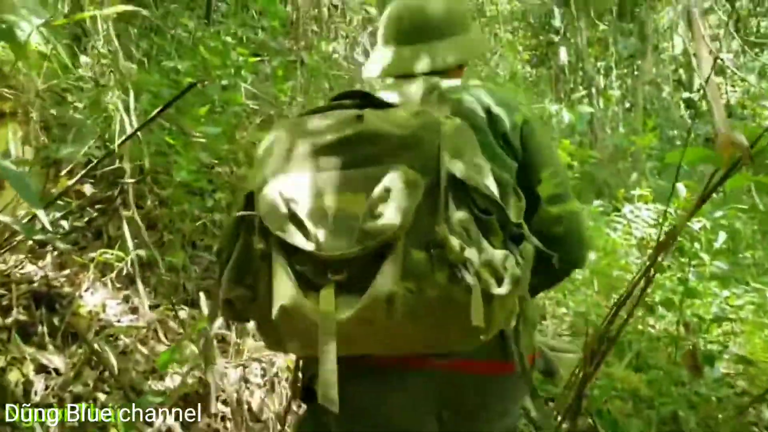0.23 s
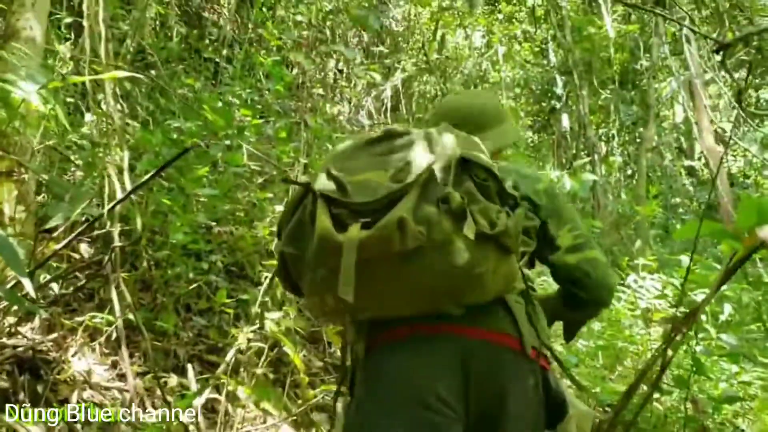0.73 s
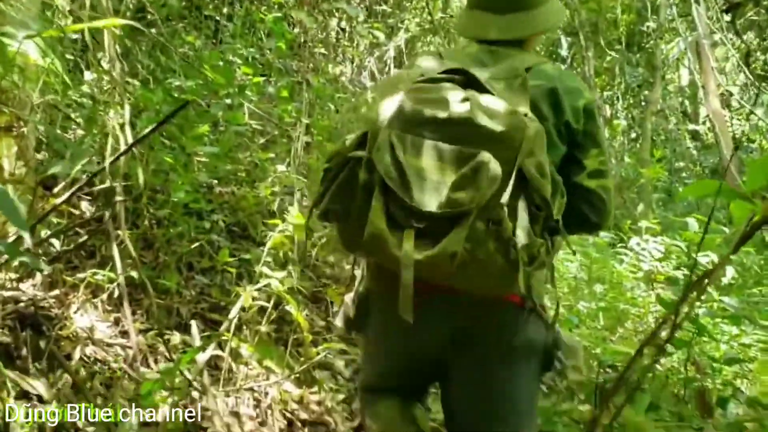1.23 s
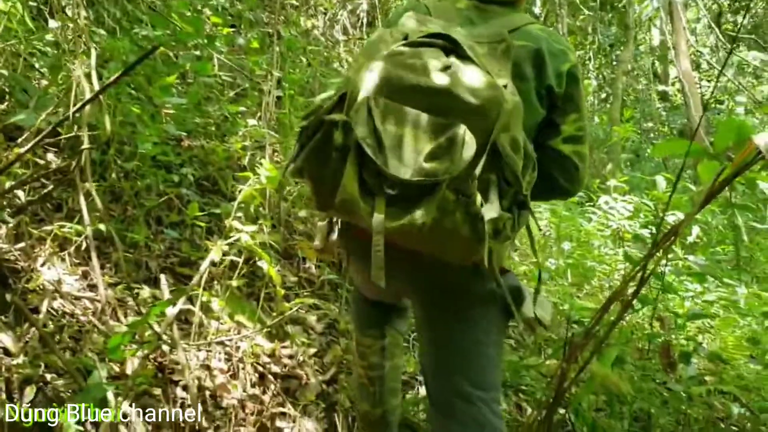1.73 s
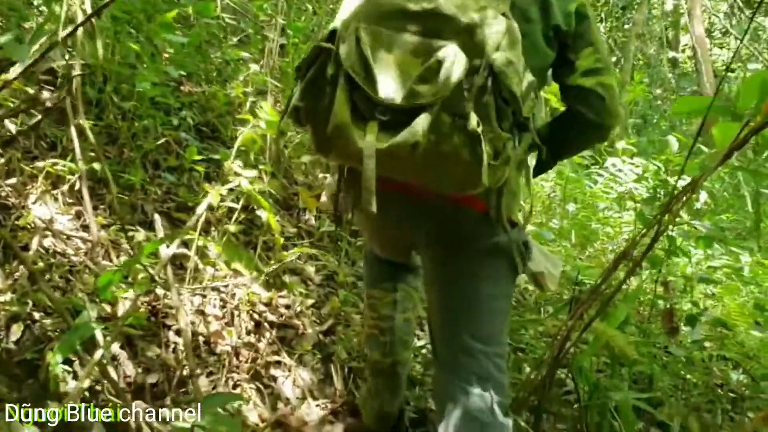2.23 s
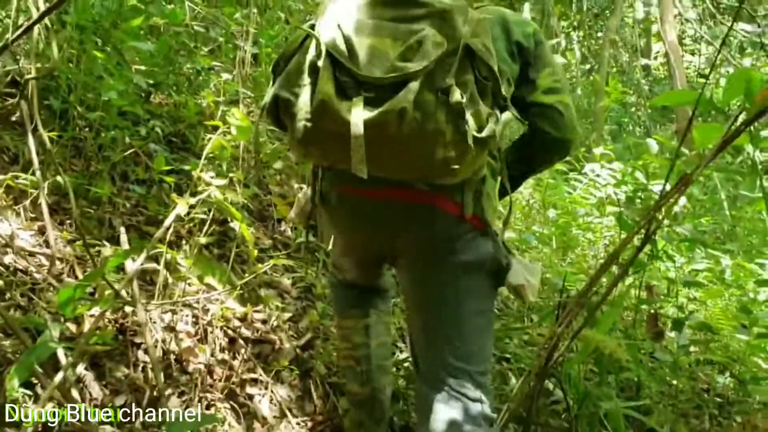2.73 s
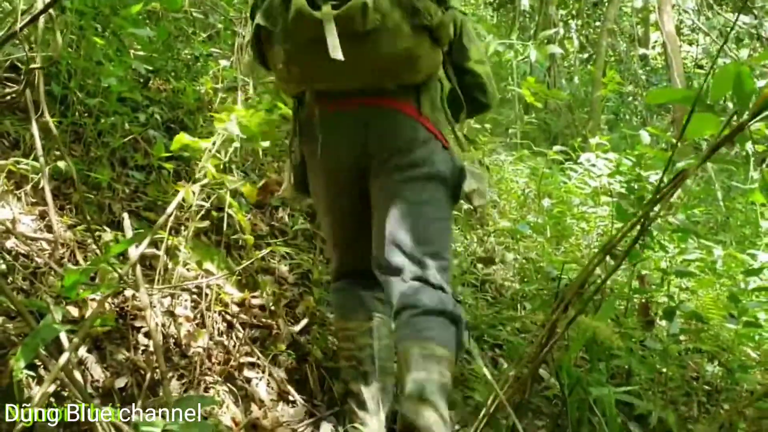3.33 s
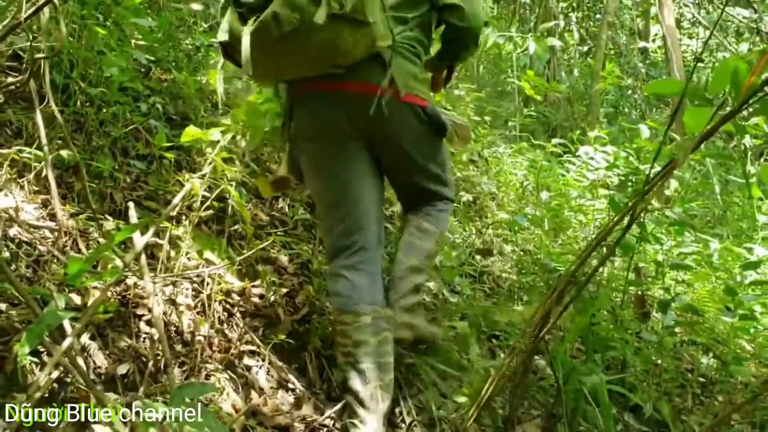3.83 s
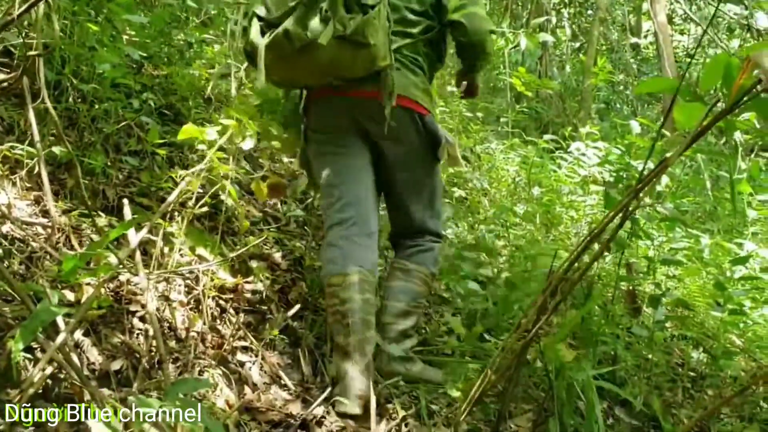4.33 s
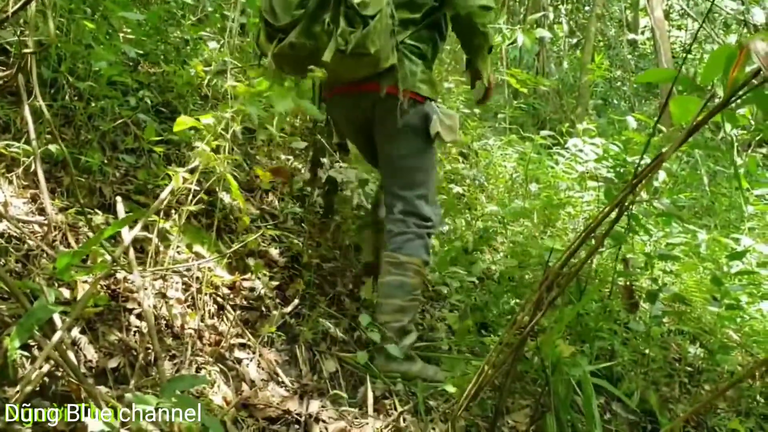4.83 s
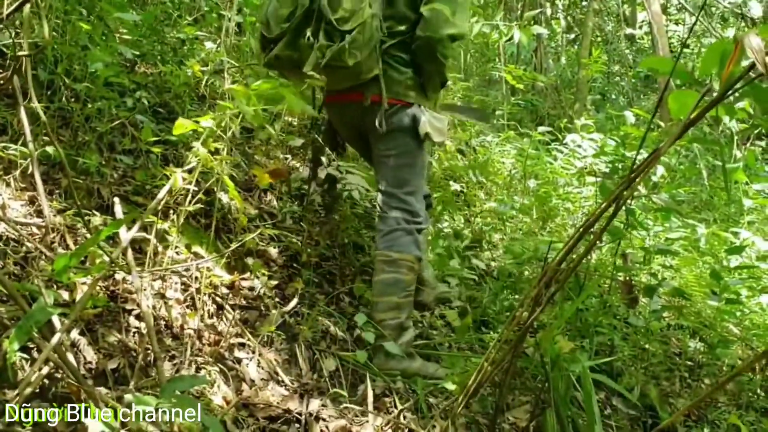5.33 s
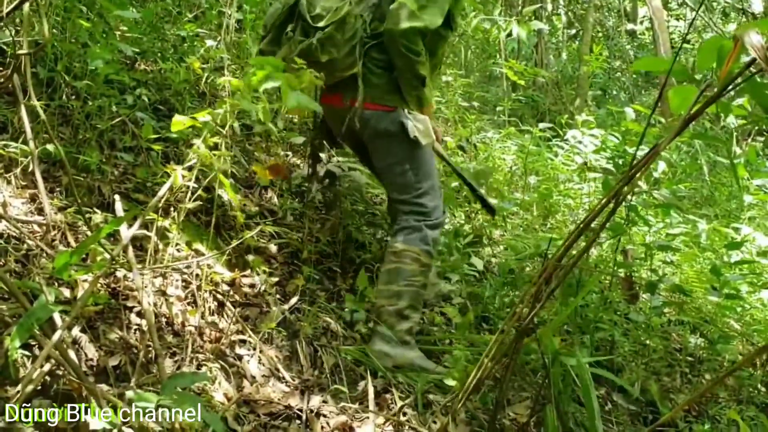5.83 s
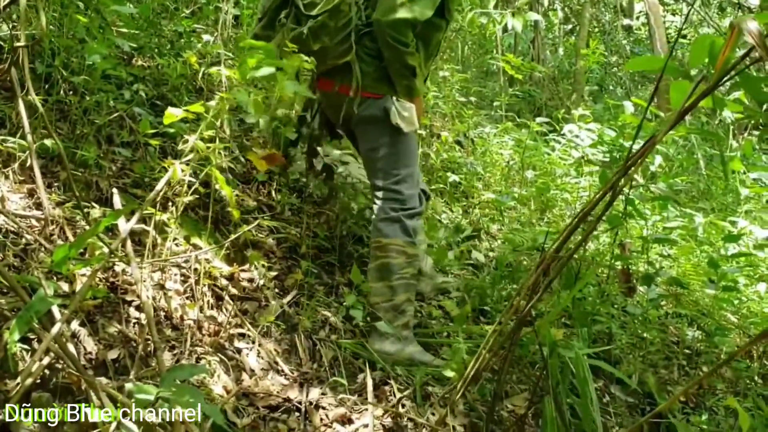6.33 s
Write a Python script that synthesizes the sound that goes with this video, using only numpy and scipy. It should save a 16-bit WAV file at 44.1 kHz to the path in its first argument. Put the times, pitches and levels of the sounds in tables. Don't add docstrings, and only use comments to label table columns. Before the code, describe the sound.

A close, dry outdoor sound of rubber boots climbing through leaf litter, slightly left of centre, over a faint, wide forest hiss. From 0 s leaves crackle and rustle softly; twigs snap near 0.4 s, a brittle crack comes at 0.53, and a big crunch swells from 0.6 to 0.9 with woody knocks. Shorter crunches and snaps follow at 1.0-1.15, then it calms. At 1.65-1.9 a low fluttering air puff hits the left side only. Brushing leaves and snaps lead to a hard, abrupt knock and crunch at 2.5. Leaves settle, with treads near 2.9, 3.15 and 3.4 and a sharp snap at 3.98. A broad heavy crunch with deep soil thumps lands at 4.1-4.2, fading in rustles. Quiet until a step at 5.18, a left-side crack at 5.72, then light crunches and swishes at 5.8, 6.2 and 6.4 to the end.

```python
import sys
import numpy as np
from scipy import signal
from scipy.fft import rfft, irfft, dct, next_fast_len
from scipy.io import wavfile
from scipy.ndimage import uniform_filter1d, map_coordinates

SR = 44100
rng = np.random.default_rng(int(sys.argv[2]) if len(sys.argv) > 2 else 0)


def waveform_to_disk(signal):
    frames = np.transpose(np.atleast_2d(signal))
    scaled = np.clip(frames, -1, 1) * 32767
    samples = np.round(scaled).astype(np.int16)
    wavfile.write(sys.argv[1], SR, samples)


def how_loud(loudness_db):
    steps = np.asarray(loudness_db, float) / 20
    return 10 ** steps


N = 289737


def unit(x):
    return x / np.sqrt(np.mean(x ** 2) + 1e-20)


def along(points, hz):
    f, v = np.transpose(points)
    return np.interp(np.log(hz + 1), np.log(f + 1), v)


def curve(rows):
    s, value = np.transpose(rows)
    return np.interp(np.arange(N) / SR, s, value)


def wobble(rate):
    knots = rng.standard_normal(int(N * rate / SR) + 4)
    return map_coordinates(knots, [np.arange(N) * rate / SR])


def filtered(x, response):
    m = next_fast_len(N + 8192)
    return irfft(rfft(x, m) * response(np.fft.rfftfreq(m, 1 / SR)), m)[..., :N]


def coloured(x, spectrum):
    return unit(filtered(x, lambda hz: how_loud(along(spectrum, hz))))


def sides(pan_db):
    half = np.atleast_1d(pan_db) / 2
    return how_loud(np.array([half, -half]))


def swells(s, db, rise, fall, bed_db=-120):
    t = np.arange(0, N / SR + .002, .001)[:, None] - s
    skirt = np.maximum(-t / np.abs(rise), t / np.abs(fall)) ** 1.5
    power = how_loud(2 * (db - 10 * skirt)).sum(1)
    return 10 * np.log10(np.interp(np.arange(N) / SR, t[:, 0] + s[0], power) + how_loud(2 * bed_db))


# f/Hz, likeness (0 to 1)
ALIKE = [(100, 0.929), (300, 0.9), (600, 0.6), (1200, 0.45), (2500, 0.054)]


def diffuse():
    turn = lambda hz: np.arccos(np.clip(along(ALIKE, hz), -1, 1)) / 2
    mid, side = filtered(rng.standard_normal((2, N)), lambda hz: [np.cos(turn(hz)), np.sin(turn(hz))])
    return np.array([mid + side, mid - side])


# f/Hz, level/dB
FOREST = [(18, -36), (30, -15.5), (71, 2), (236, -16), (388, 8.5), (764, -5.5), (1860, -3), (3480, -2),
          (4170, 5), (7410, 0), (8670, -5.5), (15400, 3)]


def forest():
    return how_loud(-64.5 + .8 * wobble(3)) * coloured(diffuse(), FOREST) * sides(3)


def patches(x, depth_db):
    z = signal.stft(x, nperseg=256)[2]
    field = uniform_filter1d(rng.standard_normal(z.shape[1:]), 5, 0)
    field = uniform_filter1d(field, 8, 1)
    return signal.istft(z * how_loud(depth_db * unit(field)), nperseg=256)[1][:, :N]


def crackle(count, spread_db, life_s, clump_db, hush, lurch):
    port_gap_s = .00016
    when, near = rng.uniform(size=(2, count))
    size = how_loud(spread_db * np.minimum(rng.exponential(size=count), 3.8)) * rng.choice([-1, 1], count)
    lag = rng.standard_normal(count) * port_gap_s * SR
    kind = rng.integers(0, 4, count)
    t = np.arange(SR // 40) / SR
    out = np.zeros((2, N))
    for k in range(4):
        ring = rng.standard_normal(len(t)) * how_loud(-60 * t / (life_s * (1 + k) / 2.144))
        pick = kind == k
        for ch, sign in enumerate((1, -1)):
            at = np.clip(when[pick] * N + sign * lag[pick] / 2, 0, N - 1).astype(int)
            hits = np.bincount(at, size[pick] * how_loud(sign * 7.307 * (near[pick] - 1.0)), N)
            out[ch] += signal.fftconvolve(hits, unit(ring))[:N]
    slips = np.bincount((when[:240] * N).astype(int), near[:240] ** 2, N)
    surge = 1 + lurch * signal.fftconvolve(slips, how_loud(-60 * t / 0.08682))[:N]
    shower = patches(unit(out) + hush * diffuse(), depth_db=1.6829)
    return surge / np.mean(surge) * shower * how_loud(clump_db * wobble(45))


# f/Hz, level/dB
BLADES = [(1350, -14), (2300, -13), (3190, -1.5), (3680, 0.5), (7150, -1), (8690, -14.5), (9500, -13.5),
          (12400, -22), (20900, -120)]
EDGES = [(6500, -30.5), (8000, -4), (9500, -1), (12000, 3.5), (16500, 0)]
STEMS = [(440, -64), (750, -34), (914, -5), (1240, 4.5), (1680, 6), (2900, 3), (3770, -37.5), (6380, -120)]
# peak t/s, blade level/dB, rise t/s per 10 dB, fall t/s per 10 dB,
# stems over blades level/dB
STEPS = [(0.057, -49, 0.179, 0.1409, -8.5), (0.114, -49, -0.0097, 0.039, -13),
         (0.306, -56.5, 0.1385, 0.1269, -2), (0.42, -57.5, 0.1224, 0.1045, 3.5),
         (0.595, -44, 0.0834, 0.1676, -8.5), (0.776, -38, 0.1497, 0.0681, -10),
         (0.994, -56, 0.1739, 0.0224, -3), (1.047, -48, 0.0258, 0.0319, -6.5),
         (1.118, -47, 0.0495, 0.0333, -9), (1.435, -59, 0.2004, 0.055, -5),
         (1.492, -53, 0.0309, 0.0697, -8.5), (1.511, -61.5, 0.0766, 0.1271, -5.5),
         (2.072, -50, 0.0549, 0.0721, -9.9), (2.487, -43, 0.0342, 0.056, -5.5),
         (2.904, -52, 0.018, 0.2917, -12.5), (3.148, -52, 0.0164, 0.5885, -11.5),
         (3.387, -49.0, 0.0111, 0.1323, -12), (4.108, -41.5, 0.16, 0.1784, -9),
         (4.466, -53.5, 0.4696, 0.1462, -6.5), (5.179, -48, 0.0251, 0.0634, -10.5),
         (5.511, -61, 0.0917, 0.0514, -4.0), (5.816, -50, 0.1008, 0.0616, -10),
         (6.198, -50, 0.0371, 0.0805, -8.5), (6.401, -49.5, 0.0972, 0.1237, -12)]
# peak t/s, blade level/dB, rise t/s per 10 dB, fall t/s per 10 dB,
# edges over blades level/dB
SWEEPS = [(0.214, -57.5, -0.0022, 0.5148, 1.171), (0.399, -52, 0.056, 0.04, 10),
          (0.897, -44.5, 0.2357, 0.1427, 1.5685), (1.287, -53, 0.4006, 0.097, 1.8781),
          (1.646, -55.5, 0.029, 0.0611, 1.7531), (1.685, -64, 0.1444, 0.16, -6),
          (1.826, -56, 0.0566, 0.1, 0.443), (1.938, -47, 0.0681, 0.0939, 2.5),
          (2.154, -57, 0.0313, 0.0263, 0.2147), (2.286, -55, 0.1332, 0.2899, 0.2868),
          (2.52, -57, 0.103, 0.1511, -7), (2.706, -63.5, 0.201, -0.142, -1.0552),
          (2.799, -53, 0.0471, 0.0972, 1.3281), (3.661, -52.5, 0.2468, 0.1011, 0.6984),
          (3.88, -51, 0.0439, 0.2865, 4.5), (4.323, -53, 0.1265, 0.318, 1.1756),
          (4.715, -62.0, 0.8057, 0.0228, 0.3477), (4.816, -60, 0.1533, 0.0847, -2.5),
          (5.096, -61.5, 0.206, 0.0527, -0.8368), (5.285, -55, 0.0564, 0.0433, -1),
          (5.725, -50.5, 0.0598, 0.0441, 0.3431), (5.902, -54, 0.045, 0.0824, 1.9433),
          (6.107, -63, 0.0843, 0.1369, 1.056), (6.306, -52, 0.0584, 0.1421, 3.5)]


def leaves():
    bed_db, pan_db, sweep_stem_db = -74.5, 4.5, -15.5
    s, db, rise, fall, stems = np.transpose(STEPS)
    s2, db2, rise2, fall2, edges = np.transpose(SWEEPS)
    edges = np.r_[1.4046 + 0.19145 * (db + 50), edges]
    stems = np.r_[stems, np.full(len(s2), sweep_stem_db)]
    s, db, rise, fall = np.r_[s, s2], np.r_[db, db2], np.r_[rise, rise2], np.r_[fall, fall2]
    blade_db = swells(s, db, rise, fall, bed_db)
    edge_db = swells(s, db + edges, rise, fall, bed_db + np.mean(edges))
    stem_db = swells(s, db + stems, rise, fall, bed_db + np.mean(stems))
    shower = crackle(count=16000, spread_db=3.5, life_s=0.005119, clump_db=0.7463, hush=0.98884, lurch=0.3)
    blade = how_loud(blade_db) * coloured(shower, BLADES)
    edge = how_loud(edge_db) * coloured(shower, EDGES) * sides(2.2)
    stem = how_loud(stem_db) * coloured(shower, STEMS)
    return (blade + edge) * sides(pan_db) + stem * sides(0.75 + 0.8213 * pan_db)


def braced():
    brace_s, brace_db = .012, -2
    t = np.arange(N) / SR
    breaks = np.sort([row[0] for row in SNAPS + BRITTLE + SMALL_SNAPS] + [N])
    ahead = breaks[np.searchsorted(breaks, t)] - t
    return how_loud(brace_db * np.clip(1 - ahead / (2 * brace_s), 0, .5) * 2)


# f/Hz, level/dB
LITTER = [(100, -19.5), (170, -9.5), (349, 2), (389, 4), (542, -1), (799, -11), (950, -12.5), (1240, -48),
          (2090, -120)]
SOIL = [(15, -41.5), (25, -33.5), (59, 2.5), (124, 0.3), (178, 0.5), (250, -2), (320, -6.5), (550, -120)]
# peak t/s, litter creak level/dB, soil push level/dB, rise t/s per 10 dB,
# fall t/s per 10 dB
WEIGHT = [(0.114, -57.5, -69, 0.1627, 0.1574), (0.394, -57.5, -86, 0.1977, 0.089),
          (0.604, -51.5, -66, 0.0816, 0.0311), (0.682, -52.5, -63, 0.0489, 0.2179),
          (0.807, -48, -63, 0.1808, 0.0237), (0.919, -54.5, -91.5, 0.2092, 0.0903),
          (1.122, -58.0, -75.0, 0.2167, 0.0435), (1.21, -61.5, -75.5, 0.0315, 0.2559),
          (1.424, -62, -89.0, 0.0871, 0.0765), (1.6, -62, -91.0, 0.0272, 0.08),
          (1.688, -61, -90.0, 0.0261, 0.2208), (1.95, -61.5, -71.5, 0.3249, 0.0765),
          (2.079, -58.5, -59, 0.0731, 0.2118), (2.309, -65.5, -67.5, 0.1961, 0.1612),
          (2.487, -41, -57, 0.0199, 0.024), (2.5, -60, -54.5, 0.0989, 0.1042),
          (2.706, -66, -71, 0.14, -0.0371), (3.21, -67.0, -74, 0.604, 0.1655),
          (3.378, -62.5, -59, 0.048, 0.1092), (4.158, -54, -60, 0.2027, 0.0262),
          (4.17, -61, -58.5, 0.1669, 0.3873), (5.21, -62.5, -71.5, 0.0984, 0.0949),
          (5.519, -70.5, -73, 0.1986, 0.055), (6.2, -64, -67, 0.1336, 0.2903)]
# t/s, level/dB
SETTLING = [
    (0, -71),
    (2.7, -79),
    (3.9, -68.5),
    (4.65, -79),
    (5.4, -84),
    (5.8, -71.5),
    (5.97, -79.5),
    (6.57, -77),
]


def tread():
    s, creak_db, push_db, rise, fall = np.transpose(WEIGHT)
    creak_db = swells(s, creak_db, rise, fall, curve(SETTLING))
    push_db = swells(s + 0.01553, push_db, 0.609 * rise, 0.29144 * (rise + fall), bed_db=-76.5)
    grains = crackle(count=6000, spread_db=2.5, life_s=0.006694, clump_db=1.5, hush=1.0, lurch=0.2732)
    creak = coloured(grains, LITTER)
    give = rng.standard_normal(N) + .18 * rng.standard_normal((2, N))
    push = coloured(give * how_loud(1.5 * wobble(20)), SOIL)
    return (how_loud(creak_db) * creak + how_loud(push_db) * push) * sides(5.2)


# t/s, level/dB
HOLLOW = [
    (0, 3),
    (1.5, 2),
    (1.9, -1.5),
    (2.5, 5),
    (3.1, -2.5),
    (4.3, -4),
    (5.5, -1.5),
    (6.57, -6),
]


def grounded(x):
    centre_hz, width = 730, 0.15
    band = filtered(x, lambda hz: np.exp(-(np.log(hz / centre_hz + 1e-9) / width) ** 2))
    return x + (how_loud(curve(HOLLOW)) - 1) * band


# t/s, peak level/dB, pitch f/Hz, life t/s
KNOCKS = [(0.0565, -45, 400.4, 0.01105), (.2026, -44, 512.6, 0.01102), (0.7614, -30.5, 574.2, 0.01093),
          (1.0588, -45, 571.5, 0.01128), (1.428, -50, 399.1, 0.00874), (2.166, -47.5, 440.1, 0.0174),
          (2.2757, -49.5, 348.3, 0.01748), (2.399, -52.5, 409.6, 0.0117), (3.1282, -52, 460.5, 0.01228),
          (3.307, -54.5, 390.8, 0.01201), (3.3887, -47.5, 330.2, 0.01356), (3.5784, -56, 390.1, 0.01507),
          (4.959, -59, 470, 0.01314), (6.17, -51, 349.9, 0.01185), (0.557, -47.5, 546.1, 0.0131),
          (0.682, -34.5, 550, 0.01125), (0.796, -29.5, 547.7, 0.0142), (0.913, -41, 573.7, 0.02392),
          (1.224, -47, 595.8, 0.01866), (1.416, -49, 363.9, 0.0156), (1.578, -59, 392.5, 0.01193),
          (2.076, -40, 537.4, 0.00958), (2.471, -33.5, 525.6, 0.00968), (2.4968, -21.5, 403.3, 0.00945),
          (2.698, -50, 301.5, 0.01769), (3.163, -53, 417, 0.01021), (3.653, -54, 355.2, 0.0124),
          (4.089, -36.5, 287.6, 0.01883), (4.483, -48.5, 438.7, 0.01525), (5.139, -57.5, 468.6, 0.01982),
          (5.162, -52, 377.9, 0.0215), (5.715, -52, 522.8, 0.01856), (6.156, -47.5, 342.3, 0.01484),
          (6.195, -41.5, 207, 0.0133), (6.286, -51.5, 370.7, 0.01437)]


def knocks():
    out, t = np.zeros(N + SR), np.arange(SR // 10) / SR
    for s, db, hz, life in KNOCKS:
        swing = how_loud(-60 * (t / life) ** 2) * np.sin(2 * np.pi * 1.0782 * hz * t)
        ring = .5 * how_loud(-60 * t / 0.03474) * np.sin(2 * np.pi * 0.48837 * hz * t)
        out[round((s + .002) * SR):][:len(t)] += how_loud(db - 5.5) * (swing + ring)
    return out[:N] * sides(4.2)


# t/s, peak level/dB, brightness f/Hz, left over right level/dB
SNAPS = [(.2769, -39.5, 14500, -1.9), (.3925, -29, 14000, 10.6), (.4369, -33, 13000, 8.6),
         (.9014, -28, 13500, -5.2), (1.0355, -33, 7400, 5.8), (1.0506, -29, 9300, 3.5),
         (1.1189, -33, 10500, 6.2), (1.4742, -37.4, 10500, 6.9), (1.5128, -35.5, 4500, 6),
         (1.9043, -33, 14500, 9.7), (1.9331, -33, 13000, 6.8), (2.0627, -39, 9400, 7.6),
         (2.1516, -28.5, 13000, 4.3), (2.2255, -39, 6700, 9.2), (2.7812, -36.5, 9800, 3.4),
         (2.7924, -35, 13000, 3.9), (2.8966, -30, 12500, 3.8), (3.1659, -28.9, 6000, 8),
         (3.2414, -36, 13000, 10), (3.2444, -33.5, 10100, 11.9), (3.3819, -38.5, 7500, 7.6),
         (3.4923, -31.5, 7000, 8), (3.6453, -35, 14000, 0), (3.9794, -25, 13500, 2.1),
         (4.014, -29, 13000, 7.8), (5.0553, -35.5, 5500, 5.1), (5.095, -39, 6000, 2.8),
         (5.6934, -37, 6800, 4.2), (.705, -25, 12500, 5), (.7375, -26, 13000, 5), (2.4715, -35, 3500, 4),
         (2.9155, -38, 13900, 3), (3.8234, -42, 13500, 4), (5.1685, -38, 5500, 4), (5.183, -36, 5000, 4)]
# t/s, peak level/dB
SMALL_SNAPS = [(1.124, -32), (1.534, -41), (1.641, -41), (1.772, -46), (2.232, -43), (1.7927, -43), (2.0785, -33),
               (2.3985, -41), (2.4433, -40), (2.7557, -45), (2.7653, -45), (2.806, -39), (3.0775, -42),
               (3.3, -39), (3.1266, -38), (3.517, -41), (3.715, -41), (3.7438, -42), (4.7154, -45), (4.7493, -47),
               (5.1414, -47), (5.6757, -42), (5.699, -38), (5.9036, -41), (6.0474, -42.5), (6.0741, -48),
               (6.1594, -45)]
# t/s, peak level/dB, brightness f/Hz, left over right level/dB
BRITTLE = [
    (.5281, -24, 8000, 10.8),
    (4.7866, -34.5, 11500, 6.1),
    (5.7176, -29, 8000, 8.8),
]


def snaps():
    tear, tear_s, crumble, crumble_s = .42, .28, .14, .08
    out, lead = np.zeros((2, N + SR)), SR // 300
    t = (np.arange(SR // 12) - lead) / SR
    f = np.fft.rfftfreq(len(t), 1 / SR)
    twigs = list(SNAPS) + [(s, db, 8000, 6) for s, db in SMALL_SNAPS]
    twigs = [(*row, .0043) for row in twigs] + [(*row, .002) for row in BRITTLE]
    for s, db, hz, pan_db, life in twigs:
        body_db = -12 - 6 * np.log(hz / 9500)
        bright = np.exp(-(np.log(f / hz + 1e-3) / .85) ** 2)
        body = how_loud(body_db) * np.exp(-(np.log(f / 1700 + 1e-3) / .45) ** 2)
        noise = rng.standard_normal((3, len(t)))
        noise = noise[0] + 1.2965 * noise[1:]
        burst = irfft(rfft(noise) * (bright + body), len(t))
        fall = how_loud(-60 * t / (2.5 * life)) + crumble * how_loud(-60 * t / crumble_s)
        burst = burst * np.where(t < 0, tear * (t > -tear_s * life), fall)
        burst = burst / np.abs(burst).max(axis=1, keepdims=True)
        out[:, round(s * SR) - lead:][:, :len(t)] += how_loud(db - 1) * sides(pan_db) * burst
    return out[:, :N]


# t/s, peak level/dB, pitch f/Hz, left over right level/dB
POPS = [(.2769, -42, 1414, -4), (0.387, -48.5, 1311, -5), (.5284, -47.5, 1502, -0.5),
        (.605, -43.5, 1487, -4), (.7345, -40.5, 2102, 1.5), (.738, -42.5, 2111, 2),
        (0.7631, -42, 1422, 0.5), (0.7654, -37.5, 2396, 2.5), (.778, -40, 2148, 1.5),
        (.7981, -44.5, 1250, -2), (1.0348, -42, 2610, 1.5), (1.1206, -45, 2935, 10.5),
        (1.2468, -56.5, 1307, -4.5), (1.4164, -54.5, 1483, 8), (1.4249, -58.5, 1423, 5),
        (1.486, -49.5, 2526, 8), (1.4935, -58, 1361, -4), (1.5132, -45, 2738, 12.5),
        (2.0305, -53.5, 1137, -1), (2.0788, -52.5, 1179, 1), (2.4803, -42.5, 1372, 2),
        (2.4994, -39.5, 1032, 0), (2.5282, -46, 1166, 4), (2.6273, -62.5, 1260, 1),
        (2.7552, -58.5, 2800, 4.5), (2.897, -45.5, 2383, 5), (3.3983, -51, 1321, 0),
        (3.4933, -51.5, 1403, 7), (3.656, -54, 1124, -2.5), (3.6692, -49.5, 2914, 5),
        (3.7444, -53, 1355, 9), (3.8132, -54.5, 2791, 9), (4.1075, -40.5, 1239, 2.5),
        (4.3126, -48, 1421, 6), (4.3228, -46, 2948, 7.5), (4.4256, -51, 1248, 4),
        (4.4866, -43.5, 1266, 5.5), (4.4861, -48, 2515, 4), (4.496, -52, 1373, 7),
        (4.7311, -68.5, 1423, -7), (4.8035, -65.5, 1118, 7), (4.8312, -58, 2598, -1),
        (4.9937, -62.5, 3137, 0.5), (5.1824, -51.5, 1308, 4.5), (5.532, -52.5, 2124, -13.5),
        (5.7182, -48, 1475, 12), (6.1065, -63, 1461, 6), (6.16, -54.5, 2443, 0), (6.2074, -55.5, 1235, 4.5)]


def pops():
    rise_s, fall_s = 0.0006263, 0.001949
    out, lead = np.zeros((2, N + SR)), SR // 200
    t = (np.arange(SR // 40) - lead) / SR
    shape = np.exp(-np.where(t < 0, (t / rise_s) ** 2, t / fall_s))
    for s, db, hz, pan_db in POPS:
        pop = shape * np.cos(2 * np.pi * hz * t)
        out[:, round((s - .0006) * SR) - lead:][:, :len(t)] += how_loud(db + 1.5) * sides(pan_db) * pop
    return out[:, :N]


# t/s, peak level/dB, pitch f/Hz
THUMPS = [(.7, -56, 118), (2.097, -56, 75), (2.155, -60, 65), (2.5, -40, 180), (2.535, -54, 60),
          (3.39, -57, 120), (4.104, -55, 135), (4.148, -46.5, 88), (4.179, -41, 110), (4.203, -45, 135),
          (6.207, -56, 105)]


def thumps():
    turns = 0.75
    out, lead = np.zeros(N + SR), SR // 20
    t = (np.arange(SR // 10) - lead) / SR
    for s, db, hz in THUMPS:
        swing = np.exp(-(t * hz / turns) ** 2) * np.sin(2 * np.pi * hz * t)
        out[round(s * SR) - lead:][:len(t)] += how_loud(db) * swing
    return out[:N] * sides(3.5)


# t/s, level/dB
PUFF = [
    (1.64, -99.5),
    (1.672, -53),
    (1.688, -48),
    (1.756, -58.5),
    (1.778, -49),
    (1.878, -62.5),
    (1.9, -82.5),
]


def puff():
    t = np.arange(N) / SR
    gate = (t > PUFF[0][0]) & (t < PUFF[-1][0])
    swing = 2 * np.pi * np.cumsum(57 + 3 * wobble(25)) / SR
    beat = 1 + .5 * np.cos(2 * np.pi * 22.5 * (t - 1.69))
    eddies = (np.sin(swing) + .12 * np.sin(2 * swing + 1)) * beat
    return np.array([how_loud(curve(PUFF) + 6.0) * gate * eddies, np.zeros(N)])


def scene():
    ground = grounded(braced() * leaves() + tread() + forest())
    return ground + snaps() + knocks() + thumps() + pops() + puff()


# f/Hz, level/dB against the treble mean
STARVED = [(2000, -12), (2450, -8), (3000, -6), (3300, -1.5), (3650, -1.5), (3950, -5), (4700, -4.5),
           (6000, -5), (7400, -8), (8700, -7), (10000, -9), (12000, -13)]
# f/Hz, rounding step over band rms
COARSE = [(700, .2), (1400, .5), (2200, 1.7), (3200, 2.1), (5500, 1.85), (8500, 1.9), (11000, 1.5),
          (14000, 1)]
# start t/s, length t/s, low f/Hz, high f/Hz, # added threshold level/dB
THIN_CENTRE = [(.05, .1, 2900, 3750, 5), (.1, .04, 7600, 9000, 7), (.335, .135, 3000, 6200, 5),
               (.54, .1, 3900, 5100, 1.5), (1.16, .17, 3650, 4300, 6), (1.35, .05, 5000, 6800, 6),
               (1.16, .29, 8200, 9000, 1.5), (1.57, .18, 8200, 9300, 2), (1.78, .09, 2500, 3900, 4),
               (2.33, .12, 3500, 3900, 4), (2.52, .04, 7700, 8200, 9), (2.8, 1.7, 3200, 3800, 2.5),
               (2.98, .12, 8800, 9600, 5), (3.85, .1, 4500, 5000, 5), (4.97, .08, 7900, 9500, 4),
               (4.6, 1.4, 3000, 3700, 1.5), (6.04, .06, 3200, 3600, 6), (6.35, .2, 2400, 3700, 3),
               (6.37, .2, 8000, 8800, 2)]


def starve(x):
    size, start, sudden, chance_db, bright_db = 1024, 896, 5, 2.6, 5
    n, lead = np.arange(2 * size), 2 * size - start
    hz = (np.arange(size) + .5) * SR / (2 * size)
    window = signal.windows.kaiser_bessel_derived(2 * size, 4 * np.pi)
    pair = np.pad([x[0] + x[1], x[0] - x[1]], ((0, 0), (lead, 3 * size)))
    frames = pair[:, np.arange(N // size + 3)[:, None] * size + n] * window
    a, b, c, d = np.split(frames, 4, axis=2)
    z = dct(np.concatenate([-c[..., ::-1] - d, a - b[..., ::-1]], axis=2), type=4, norm="ortho")
    power = uniform_filter1d(z ** 2, size=2, axis=1) + 1e-20
    mean = lambda lo, hi: power[..., (hz > lo) & (hz < hi)].mean(axis=(0, 2))[:, None]
    band = lambda v, wide: np.repeat(v.reshape(*v.shape[:2], -1, wide).mean(axis=3), wide, axis=2)
    luck = np.repeat(rng.normal(0, chance_db, z[..., ::8].shape), 8, axis=2)
    highs_db = 10 * np.log10(mean(10000, 15000) / mean(2500, 7000))
    luck = luck + (hz < 6500) * np.maximum(highs_db - bright_db, 0)
    s = ((np.arange(z.shape[1])[:, None] + 1.5) * size - lead) / SR
    for t, length, lo, hi, db in THIN_CENTRE:
        luck[0] += db * ((s > t) & (s < t + length) & (hz > lo) & (hz < hi))
    weak = band(power, 8) < how_loud(2 * (along(STARVED, hz) + luck)) * mean(2000, SR)
    weak = weak & (hz > 2000)
    weak = weak | np.roll(weak & (luck > 2 * chance_db), 1, axis=1)
    parts = np.diff(frames[0], append=0) ** 2
    parts = parts.reshape(len(frames[0]), 16, -1).sum(axis=2)
    calm = (parts.max(axis=1) < sudden * parts.mean(axis=1))[:, None]
    step = along(COARSE, hz) * np.sqrt(band(z ** 2, 32).mean(axis=0) + 1e-20)
    rounded = lambda q: np.sign(q) * np.floor(np.abs(q / step) ** .75 + .4054) ** (4 / 3) * step
    swap = lambda q: np.array([q[0] + q[1], q[0] - q[1]]) / np.sqrt(2)
    z = z * ~weak
    apart = np.repeat(rng.uniform(size=step[:, ::32].shape) < .4, 32, axis=1)
    kept = np.where(apart, swap(rounded(swap(z))), rounded(z))
    u, v = np.split(dct(np.where(calm, kept, z), type=4, norm="ortho"), 2, axis=2)
    back = np.concatenate([v, -v[..., ::-1], -u[..., ::-1], -u], axis=2) * window
    joined = back[:, 1:, :size] + back[:, :-1, size:]
    mid, side = joined.reshape(2, -1)[:, lead - size:][:, :N] / 2
    return np.array([mid + side, mid - side])


def band_limit(x):
    return signal.sosfilt(signal.butter(12, 16830, fs=SR, output="sos"), x)


# f/Hz, level/dB
PORTS = [(20, -5.5), (2300, -1.5), (3300, 0), (3550, -2), (3800, 0), (8000, -0.5), (8700, -2.5), (9400, -2),
         (15000, 2)]
# f/Hz, left over right level/dB
LOUDER_LEFT = [(60, -1.5), (150, -1.5), (500, 3.3), (1100, -3.2), (2200, 2.2), (6000, -0.6), (13000, 2.4)]


def record(dry):
    top_hz, flash_s, flash_db, flash_top_hz = 15510, .003, -8, 16750
    heard = filtered(dry, lambda hz: how_loud(along(PORTS, hz)) * sides(along(LOUDER_LEFT, hz)))
    low = filtered(heard, lambda hz: hz < top_hz)
    t = np.arange(N) / SR
    flash = sum(np.exp(-((t - row[0]) / flash_s) ** 2) for row in BRITTLE)
    top = how_loud(flash_db) * flash * (heard - low)
    top = filtered(top, lambda hz: np.clip((flash_top_hz - hz) / 400, 0, 1))
    return band_limit(starve(low) + top)


dry = scene()
out = record(dry)
waveform_to_disk(out)
```